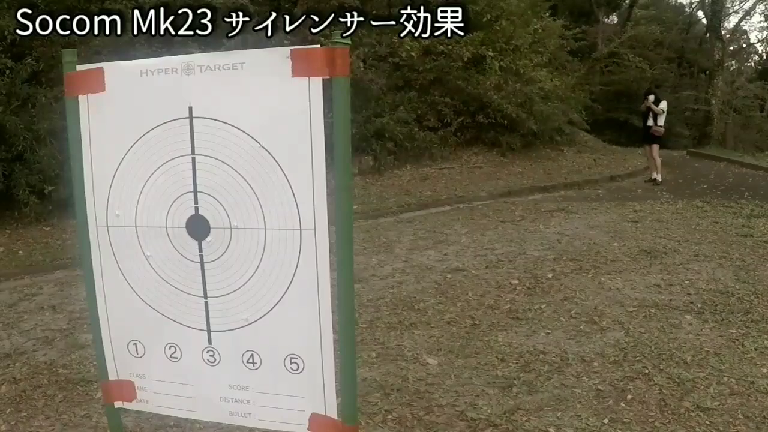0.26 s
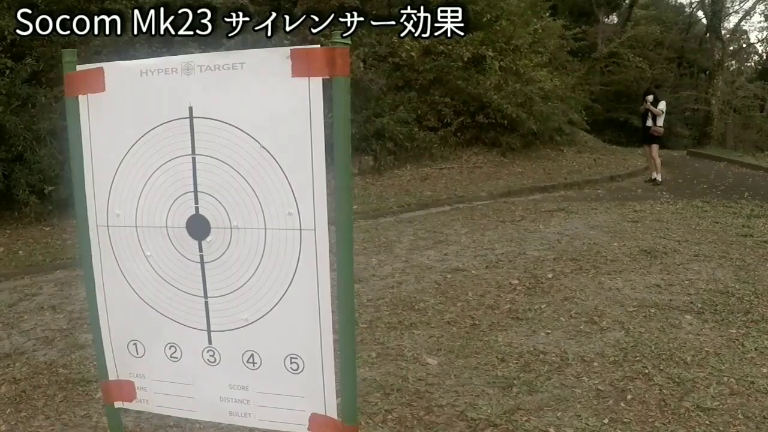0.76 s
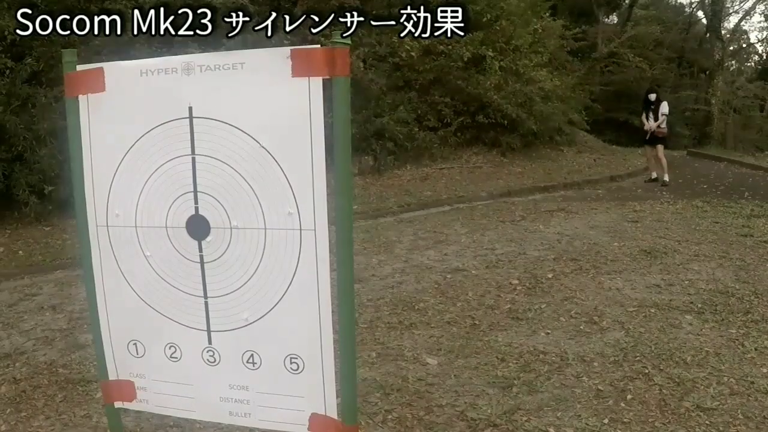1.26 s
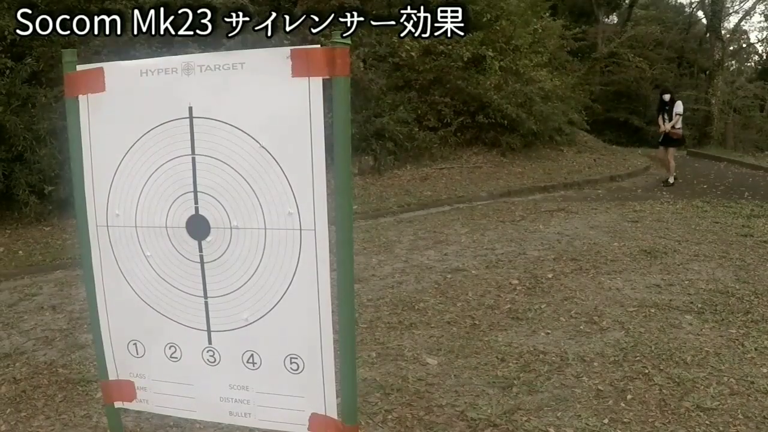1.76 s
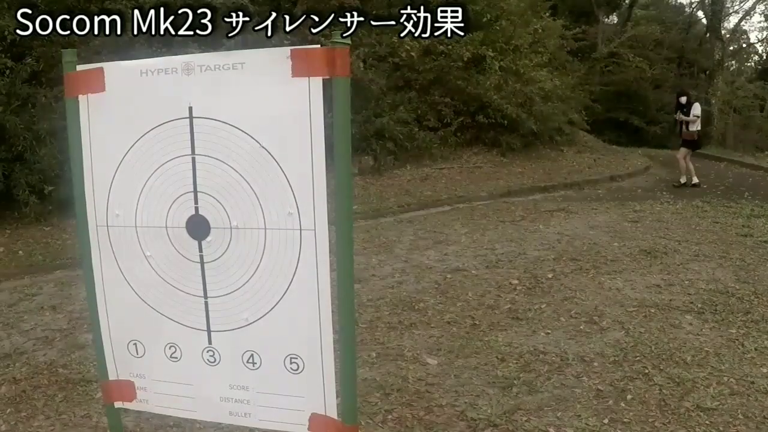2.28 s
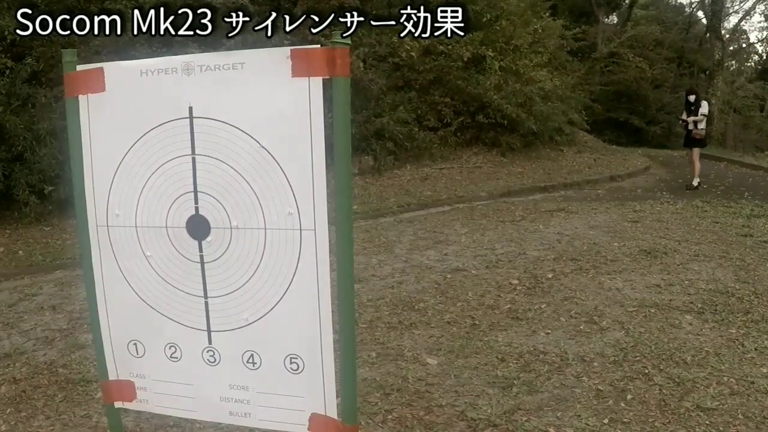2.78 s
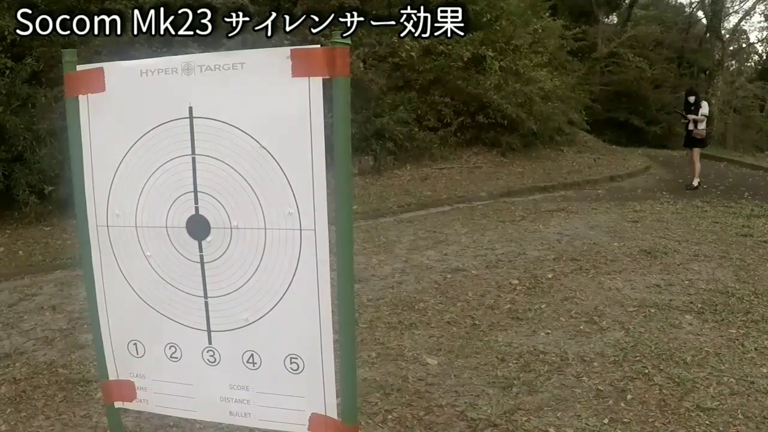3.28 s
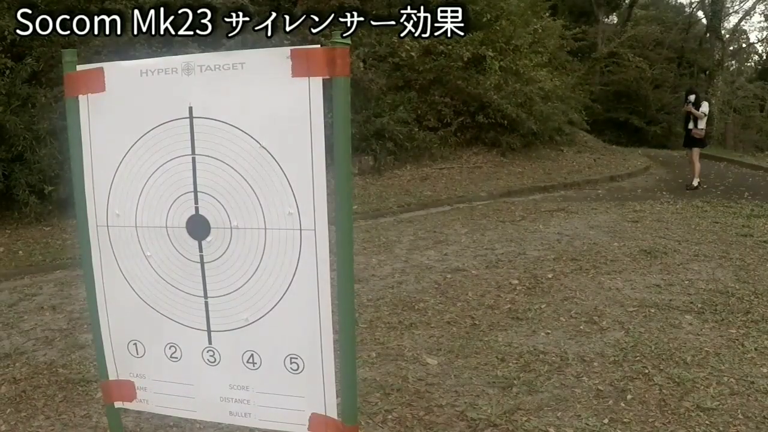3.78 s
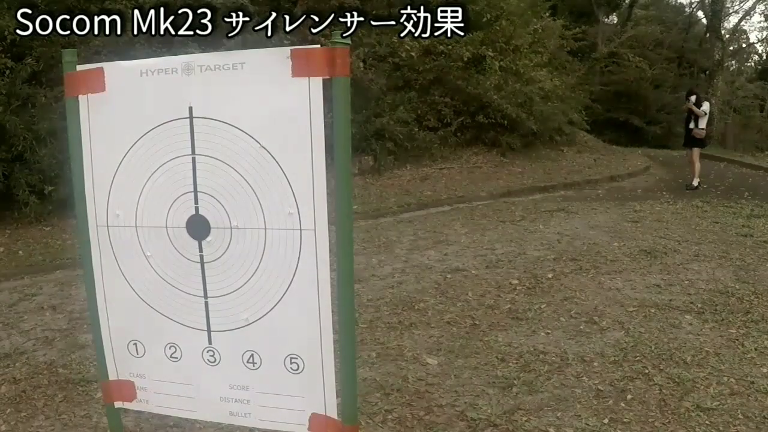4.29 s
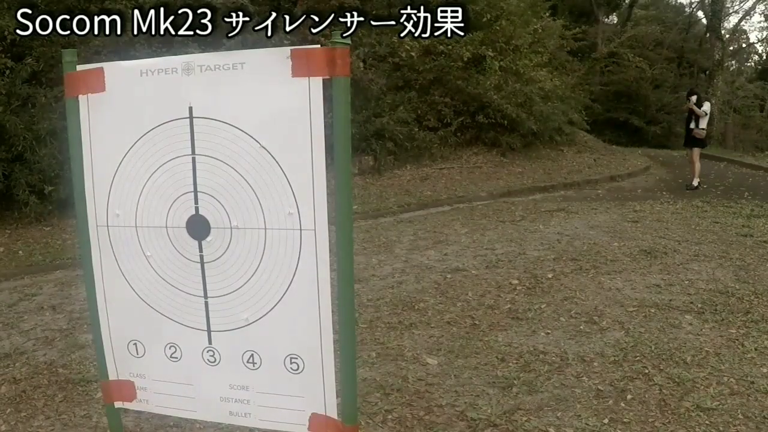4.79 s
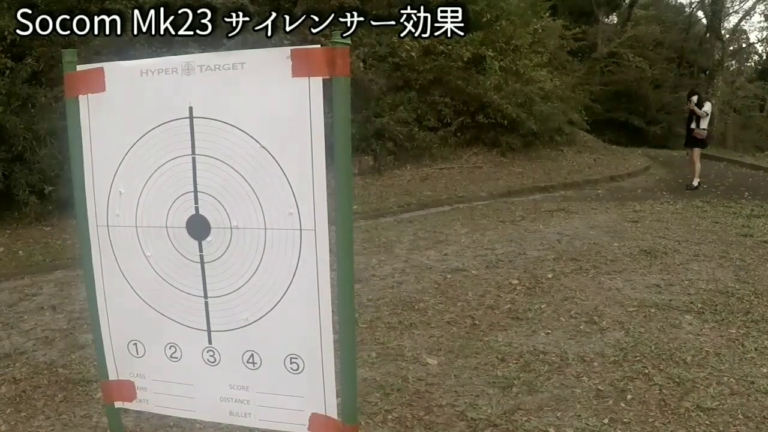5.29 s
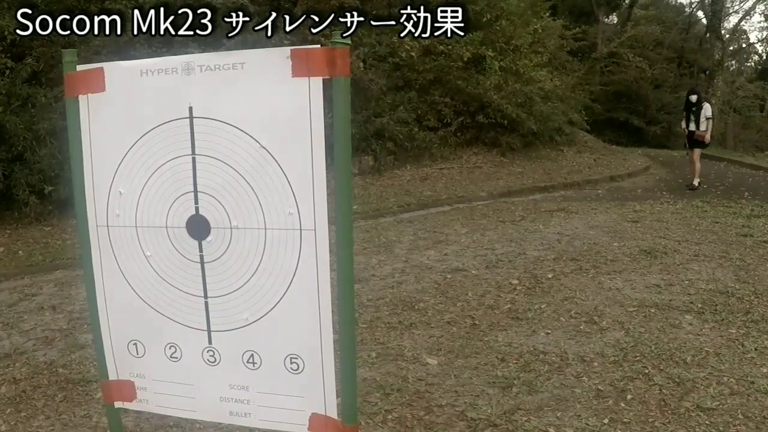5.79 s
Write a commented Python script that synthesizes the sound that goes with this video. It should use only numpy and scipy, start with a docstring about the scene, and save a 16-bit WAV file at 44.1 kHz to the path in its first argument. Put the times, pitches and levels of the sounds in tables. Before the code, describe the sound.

Two suppressed air-pistol shots about four seconds apart, each followed by a sharp close paper smack, with small handling clicks between and rumbling wind.

```python
"""In a park, a silenced gas airsoft pistol fires twice at a paper target next to the microphone.
Each shot is noise knocks and a gas puff ringing resonances, then enveloped noise as scatter from the trees.
A quarter second later the pellet whirrs in as throbbing tones and smacks the paper, a pulse through resonances
that makes the limiter duck. The pistol clicks as it is handled; shaped noise makes wind, a wash and leaves."""
import sys
import numpy as np
from scipy import signal
from scipy.fft import rfft, irfft, next_fast_len
from scipy.io import wavfile
from scipy.ndimage import uniform_filter1d, minimum_filter1d

SR = 44100
rng = np.random.default_rng(int(sys.argv[2]) if len(sys.argv) > 2 else 0)


def dump_mix(stems):
    """Bounce the given channels to the path in sys.argv[1] as a 16-bit WAV at rate SR."""
    frames = np.atleast_2d(stems).T  # one column per channel
    limited = np.clip(frames, -1, 1)  # hard clip at full scale
    pcm = np.round(limited * 32767).astype(np.int16)
    wavfile.write(sys.argv[1], SR, pcm)


N = 266797
TIME_S = np.arange(N) / SR


def from_db(db):
    """Decibels to gain."""
    return 10 ** (np.asarray(db) / 20)


def rms_one(x):
    """Scale to rms 1."""
    return x / np.sqrt(np.mean(x ** 2) + 1e-20)


def peak_one(x):
    """Scale to peak 1."""
    return x / (np.abs(x).max() + 1e-20)


def in_time(rows):
    """Each column of a curve, joined by straight lines."""
    s, *columns = np.transpose(rows)
    return [np.interp(TIME_S, s, column) for column in columns]


def add(track, start_s, sound):
    """Mix a sound into the track from start_s on."""
    i = int(round(start_s * SR))
    track[i:i + len(sound)] += sound[:N - i]


def low_pass(x, order, hz):
    """Causal Butterworth low-pass."""
    return signal.sosfilt(signal.butter(order, hz, fs=SR, output="sos"), x)


def low_part(x, hz):
    """Second-order Butterworth low-pass run both ways: no phase shift."""
    return signal.sosfiltfilt(signal.butter(2, hz, fs=SR, output="sos"), x)


def colour(x, points, share=1):
    """Filter by a (Hz, dB) curve, linear in log frequency; mirrored ends stay clean."""
    edge = SR // 20
    padded = np.pad(x, edge, mode="reflect")
    size = next_fast_len(len(padded))
    hz, db = np.transpose(points)
    bins_hz = np.maximum(np.fft.rfftfreq(size, 1 / SR), 1)
    gain_db = share * np.interp(np.log(bins_hz), np.log(hz), db)
    filtered = irfft(rfft(padded, size) * from_db(gain_db), size)
    return filtered[edge:edge + len(x)]


def noise(points):
    """Noise of a given spectrum that falls away steeply beyond its ends; rms 1."""
    (low_hz, low_db), (high_hz, high_db) = points[0], points[-1]
    closed = [(low_hz / 4, low_db - 80), *points, (high_hz * 4, high_db - 80)]
    return rms_one(colour(rng.standard_normal(N), closed))


def grainy_noise(size, grain_db):
    """White noise whose level jumps at random from sample to sample."""
    return rng.standard_normal(size) * from_db(grain_db * rng.standard_normal(size))


def even_spectrum(x, share):
    """Partly fill the chance notches of a burst, so that it excites resonances more alike."""
    bins = rfft(x)
    return irfft(bins / (np.abs(bins) + 1e-9) ** share, len(x))


def resonate(x, modes, sign=1):
    """Parallel resonances; like signs leave a notch between each pair, alternating signs fill it."""
    out = 0
    for k, (hz, width_hz, db) in enumerate(sorted(modes)):
        r = np.exp(-np.pi * width_hz / SR)
        poles = [1, -2 * r * np.cos(2 * np.pi * hz / SR), r * r]
        gain = sign ** k * from_db(db) * (1 - r * r) / 2
        out = out + gain * signal.lfilter([1, 0, -1], poles, x + 1e-18)
    return out


def whistle(pitch_hz, width_hz):
    """A narrow band of noise that follows a pitch track; rms 1."""
    size = len(pitch_hz)
    # the first half lets the filter settle
    a, b = low_pass(rng.standard_normal((2, 2 * size)), 2, width_hz / 2)[:, size:]
    phase = 2 * np.pi * np.cumsum(pitch_hz) / SR
    return rms_one(a * np.cos(phase) + b * np.sin(phase))


def glides(rows):
    """Thin bands of noise that swell, glide and fade."""
    out = np.zeros(N)
    for start_s, length_s, start_hz, end_hz, width_hz, db in rows:
        u = np.linspace(0, 1, int(length_s * SR))
        band = whistle(start_hz + (end_hz - start_hz) * u, width_hz)
        add(out, start_s, from_db(db) * np.sin(np.pi * np.sqrt(u)) * band)
    return out


def trees(rise_s, hold_s, spectrum, treble_loss_db_per_s, t60_s=0.57):
    """One second of dense foliage echoes: they swell, hold and die, treble faster than bass."""
    t = np.arange(SR) / SR
    scatter = rms_one(colour(rng.standard_normal(SR), spectrum))
    low = low_part(scatter, 6500)
    treble = (scatter - low) * from_db(-treble_loss_db_per_s * t)
    fall = from_db(-60 * np.maximum(t - hold_s, 0) / t60_s)
    return (low + treble) * np.minimum(t / rise_s, 1) ** 2 * fall


def clumps(depth_db, sway_hz=45):
    """One second of slowly uneven gain: echoes arrive in clumps; rms 1."""
    sway = low_pass(rng.standard_normal(2 * SR), 2, sway_hz)[SR:]
    return rms_one(from_db(depth_db * rms_one(sway)))


# colour of the scatter near the shooter: (pitch_hz, level_db)
SHOOTER_SCATTER = [(150, -12), (500, -1), (900, 1), (1400, 1.5), (2700, 0.5), (3400, -3.5), (4300, 7.5),
                   (5200, 2), (6100, 6.5), (6900, -5.5), (9400, -2.5), (11000, -13), (12500, -5),
                   (15000, -19)]


def shooter_trees(treble_loss_db_per_s):
    """Near the shooter the scatter starts at once."""
    return trees(0.001, 0.091, SHOOTER_SCATTER, treble_loss_db_per_s)


# shots: (start_s, report_db as rms over 10 ms, tree_echo_db before the hiss and ring gains)
SHOTS = [(0.5110, -11.5, -28.5), (4.8700, -15, -29)]
# contacts of hammer and valve: (after_main_blow_s, drive_db)
ACTION = [(-0.0058, -17), (-0.0014, -15.5), (0.0, -6.5), (0.0031, -15.5)]
# resonances of pistol and silencer: (pitch_hz, width_hz, level_db)
PISTOL_MODES = [(287, 42, 9), (763, 55, 3), (930, 126, 1), (1680, 160, -4.5), (2055, 31, -5),
                (2510, 96, -0.5), (2780, 60, 3), (3240, 100, -25), (3590, 210, -4), (4160, 81, 3.5),
                (4320, 71, 2.5), (4810, 52, -12), (5400, 75, -13), (6380, 110, -11), (7150, 280, -12.5),
                (8170, 140, -5.5), (8800, 160, -35), (10000, 290, -48), (12230, 820, -16.5),
                (14900, 2900, -16.5)]
# narrow hiss bands swelling and fading around each shot: (pitch_hz, width_hz, re_report_db)
SWELL_BANDS = [(4400, 300, -13), (7800, 500, -24), (2743, 610, -15.5), (890, 180, -15.5)]


def pistol(gas_db=-22, rise_s=0.0047, fall_s=0.0037, knock_s=0.00044, swell_s=0.012,
           echo_hiss_db=-5, echo_ring_db=1.0):
    """Hammer and valve knock the body while a puff of gas swells and dies in the silencer."""
    out, lead = np.zeros(N), SR // 25
    t = np.arange(-lead, 2 * lead) / SR
    for start_s, report_db, echo_db in SHOTS:
        puff = from_db(gas_db) * np.exp(-np.abs(t) / np.where(t < 0, rise_s, fall_s))
        knocks = sum(from_db(knock_db) * (t >= at_s) * np.exp(-np.abs(t - at_s) / knock_s)
                     for at_s, knock_db in ACTION)
        drive = (puff + knocks) * rng.standard_normal(len(t))
        report = resonate(even_spectrum(drive, share=.7), PISTOL_MODES)
        report /= np.sqrt(np.sum(report ** 2) / (SR / 100))  # energy taken over 10 ms
        swell = sum(from_db(band_db) * whistle(np.full(len(t), hz), width_hz)
                    for hz, width_hz, band_db in SWELL_BANDS)
        swell = swell * np.exp(-(t / swell_s) ** 2)
        add(out, start_s + t[0], from_db(report_db) * (report + swell))
        # echo: gas hiss, plus scatter tinted by the pistol's resonances
        hiss = shooter_trees(treble_loss_db_per_s=16)
        ring = resonate(shooter_trees(treble_loss_db_per_s=20), PISTOL_MODES) * clumps(depth_db=2.5)
        echo = from_db(echo_hiss_db) * hiss + from_db(echo_ring_db) * ring
        add(out, start_s, from_db(echo_db) * echo)
    return out


# colour of the scatter at the target: (pitch_hz, level_db)
TARGET_SCATTER = [(300, -44), (1500, -1), (3000, 1), (4600, 7.5), (6000, -0.5), (7300, -5), (10000, -6.5),
                  (12000, -9), (15000, -17)]


def target_trees():
    """At the target the scatter swells in late."""
    return trees(0.053, 0.14, TARGET_SCATTER, treble_loss_db_per_s=21)


# pellet hits: (start_s, smack_peak_db, whirr_db, whirr_hz, tree_echo_db)
HITS = [(0.7646, 17.5, -17.5, 4790, -36), (5.1225, 18, -18, 4920, -35.5)]
# resonances of the paper sheet: (pitch_hz, width_hz, level_db)
PAPER_MODES = [(187, 67, -3.5), (1310, 920, -2), (2500, 770, 2), (4020, 780, 3), (4600, 340, 1.5),
               (8600, 1100, -23), (13100, 3300, -27)]


def paper_hits(crackle_db=-32, crackle_s=0.0069, crackle_band_hz=(4000, 9000), grain_db=4):
    """The pellet punches through in one sharp pulse; the torn sheet crackles for a moment."""
    out, t = np.zeros(N), np.arange(SR // 10) / SR
    band = signal.butter(1, crackle_band_hz, "band", fs=SR, output="sos")
    for start_s, smack_db, _, _, echo_db in HITS:
        grains = rms_one(signal.sosfilt(band, grainy_noise(len(t), grain_db)))
        crackle = from_db(crackle_db) * grains * np.exp(-t / crackle_s)
        smack = peak_one(resonate(signal.unit_impulse(len(t)), PAPER_MODES, sign=-1))
        add(out, start_s, from_db(smack_db) * (smack + crackle))
        add(out, start_s, from_db(echo_db) * target_trees())
    return out


# partials of the whirr: (multiple_of_whirr_hz, width_hz, level_db)
WHIRR_PARTS = [(0.415, 40, -7.5), (0.552, 594, -20), (0.916, 111, -5.5), (1.001, 90, 0.5),
               (1.691, 200, -20.5), (2.0, 397, -15), (2.241, 900, -32)]


def pellet_flight(near_s=0.013, steepness=3.2, spin_hz=95, throb=0.74, throb_lead_s=0.00054):
    """The spinning pellet whirrs, throbbing with each turn and growing fast close to the target."""
    out, to_go_s = np.zeros(N), np.arange(SR // 16, 0, -1) / SR
    turns = 1 + throb * np.cos(2 * np.pi * spin_hz * (to_go_s - throb_lead_s))
    approach = turns / (1 + (to_go_s / near_s) ** steepness)
    for hit_s, _, whirr_db, whirr_hz, _ in HITS:
        for multiple, width_hz, part_db in WHIRR_PARTS:
            # only the phase is kept: steady strength, wandering pitch
            band = whistle(np.full(len(to_go_s), multiple * whirr_hz), width_hz)
            tone = np.cos(np.angle(signal.hilbert(band)))
            add(out, hit_s - to_go_s[0], from_db(whirr_db + part_db) * approach * tone)
    return out


# thin hiss bands after every hit: (delay_s, length_s, start_hz, end_hz, width_hz, level_db)
AFTER_HISS = [(0.028, 1.0, 8450, 7100, 350, -59), (0.09, 0.44, 9750, 10200, 900, -56.5),
              (0.12, 0.5, 11600, 12100, 900, -60.5)]


def lingering_hiss():
    """Every hit leaves the same gliding bands: a slowly falling trail and two rising swishes."""
    return sum(glides([(hit_s + delay_s, *band) for delay_s, *band in AFTER_HISS])
               for hit_s, *_ in HITS)


# handling clicks: (start_s, peak_db, length_s, ring_hz, brightness_hz)
CLICKS = [(1.556, -26.5, 0.0054, 4400, 5500), (1.63, -22, 0.0046, 4160, 12000),
          (1.876, -23.5, 0.0069, 4300, 6000), (1.89, -26, 0.0095, 4040, 6000),
          (1.921, -21, 0.0042, 4130, 7500), (2.065, -23, 0.005, 950, 4500),
          (2.483, -34, 0.0037, 2170, 4500), (2.651, -28, 0.007, 7600, 8000),
          (2.802, -30, 0.0044, 2460, 4500), (2.822, -34, 0.0044, 3600, 4000),
          (2.87, -29, 0.0055, 2480, 4000), (2.895, -29.5, 0.0081, 4800, 4500),
          (2.9602, -26, 0.0043, 3600, 8000), (3.191, -32, 0.0027, 3670, 5000),
          (3.225, -27.5, 0.0076, 2400, 7000), (3.244, -26, 0.003, 3480, 11000),
          (3.3, -25.5, 0.0045, 2380, 5500)]
# resonances of the small parts: (pitch_hz, width_hz, level_db before a random offset per click)
PART_MODES = [(1100, 490, -3.5), (2410, 520, -2), (2910, 380, -2.5), (3590, 330, -1.5), (4230, 230, -3.5),
              (4830, 230, -8), (5500, 340, -20), (6660, 560, -11), (7570, 830, -3), (12600, 2600, -10)]


def handling(vary_db=3, grain_db=4, ring_db=5, ring_width_hz=200, echo_db=-28):
    """Small pistol parts scrape and snap home, softly or sharply, each time with their own ring."""
    out, t = np.zeros(N), np.arange(SR // 10) / SR
    for start_s, peak_db, length_s, ring_hz, bright_hz in CLICKS:
        u = 2 * t / length_s
        scrape = low_pass(grainy_noise(len(t), grain_db) * u * np.exp(-u), 2, bright_hz)
        modes = [(hz, width_hz, mode_db + vary_db * rng.standard_normal())
                 for hz, width_hz, mode_db in PART_MODES]
        modes.append((ring_hz, ring_width_hz, ring_db))
        add(out, start_s, from_db(peak_db) * peak_one(resonate(scrape, modes)))
        add(out, start_s, from_db(peak_db + echo_db) * shooter_trees(treble_loss_db_per_s=20))
    return out


def eddies(spectrum, evenness):
    """Turbulence with part of its chance swells evened out; rms 1."""
    x = noise(spectrum)
    level = np.sqrt(uniform_filter1d(x ** 2, size=SR // 8) + 1e-9)
    return rms_one(x / level ** evenness)


# low rumble and flutter levels, dipping around the shots:
# (time_s, rumble_db, flutter_db before flutter_trim_db)
LOW_NOISE_LEVELS = [(0.0, -19.5, -23.5), (0.39, -13, -23.5), (0.5, -21.5, -24.9), (0.62, -15, -19.5),
                    (0.77, -22.5, -27), (1.1, -20.5, -28), (1.38, -15.5, -24), (2.0, -17, -23.5),
                    (2.58, -15, -21), (2.7, -17, -24.8), (3.45, -17.5, -26), (3.85, -20.5, -26.5),
                    (4.08, -18, -27), (4.8, -19, -26.5), (4.87, -22, -27.2), (4.96, -19, -28.5),
                    (5.55, -22, -32), (6.05, -18, -25.5)]
# spectrum of the large eddies: (pitch_hz, relative_db_per_hz)
RUMBLE_SPECTRUM = [(15, -4), (25, -3.5), (31, -5), (41, -0.5), (50, -6.5), (62, -3), (80, -9.5), (100, -11),
                   (125, -19.5)]
# spectrum of the small eddies: (pitch_hz, relative_db_per_hz)
FLUTTER_SPECTRUM = [(70, -18.5), (115, 1.5), (160, -4.5), (240, -9), (300, -15), (380, -27), (550, -33.5),
                    (900, -53)]


def wind(flutter_trim_db=-2.0):
    """Large eddies rumble on the microphone, small ones flutter; both levels dip around the shots."""
    rumble_db, flutter_db = in_time(LOW_NOISE_LEVELS)
    rumble = from_db(rumble_db) * eddies(RUMBLE_SPECTRUM, evenness=0.27)
    flutter = from_db(flutter_db + flutter_trim_db) * eddies(FLUTTER_SPECTRUM, evenness=0.28)
    return rumble + flutter


# distant wash: (time_s, level_db before wash_trim_db)
WASH_LEVELS = [(0.0, -37.5), (0.45, -37), (1.05, -40.5), (1.6, -37.0), (2.55, -37), (2.75, -40.5),
               (3.35, -39.5), (4.75, -41.5), (5.4, -45), (6.05, -39.4)]
# spectrum of the wash: (pitch_hz, relative_db_per_hz)
WASH_SPECTRUM = [(250, 4), (450, 1.5), (590, -4.5), (800, 2), (1050, 1), (1700, -6), (2300, -9),
                 (3200, -17.5), (5000, -30.5)]
# spectrum of the leaves: (pitch_hz, relative_db_per_hz)
LEAVES_SPECTRUM = [(2000, -1.5), (3300, -2), (4150, 3.5), (5100, -1.5), (6000, 2.5), (7500, -4.5),
                   (9400, -7), (10400, -7.5), (11400, -11.5), (13000, -12), (15000, -20)]


def park(wash_trim_db=1, leaves_mean_db=-49.5, leaves_follow=0.22):
    """A distant wash rises and falls; the hiss of leaves takes a small share of its swing in dB."""
    wash_db, = in_time(WASH_LEVELS)
    leaves_db = leaves_mean_db + leaves_follow * (wash_db - wash_db.mean())
    wash = from_db(wash_db + wash_trim_db) * noise(WASH_SPECTRUM)
    return wash + from_db(leaves_db) * noise(LEAVES_SPECTRUM)


# far bird's falling chirp: (start_s, length_s, start_hz, end_hz, width_hz, level_db)
CHIRPS = [(4.595, 0.11, 6950, 5950, 150, -54)]


def far_bird():
    """One faint chirp: a narrow noise band gliding down."""
    return glides(CHIRPS)


def scene():
    """Everything reaches both channels alike."""
    shooting = pistol() + paper_hits() + pellet_flight() + lingering_hiss() + handling()
    mono = shooting + wind() + park() + far_bird()
    return np.array([mono, mono])


def limiter(x, ceiling_db=1.2, release_db_per_s=90, bass_share=0.072, bass_hz=230):
    """Peaks pull the gain down at once and it climbs back at a steady rate; bass is ducked less."""
    over_db = np.maximum(20 * np.log10(np.abs(x).max(axis=0) + 1e-9) - ceiling_db, 0)
    release_db = release_db_per_s * TIME_S
    cut_db = np.maximum.accumulate(over_db + release_db) - release_db
    cut_db = uniform_filter1d(-minimum_filter1d(-cut_db, size=21), size=21)
    bass = low_part(x, bass_hz)
    return (x - bass) * from_db(-cut_db) + bass * from_db(-bass_share * cut_db)


# treble tilt between the ports: (pitch_hz, left_port_db)
PORT_TILT = [(9500, 0), (10600, 1), (11800, -7), (15000, -6)]


def record(dry):
    """Left port duller at the very top; limiter, rounded overshoots, steep treble cutoff."""
    left, right = dry
    # the right port takes a tenth of the tilt, inverted
    ports = np.array([colour(left, PORT_TILT), colour(right, PORT_TILT, share=-0.1)])
    limited = limiter(ports)
    rounded = limited / (1 + (limited / .92) ** 6) ** (1 / 6)
    steep = signal.ellip(8, .05, 60, 15100, fs=SR, output="sos")
    return signal.sosfiltfilt(steep, rounded)


dry = scene()
out = record(dry)
dump_mix(out)
```